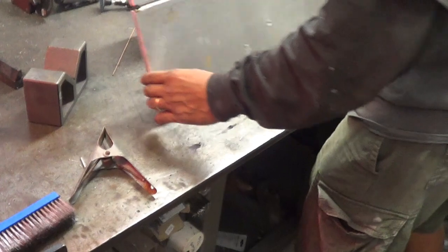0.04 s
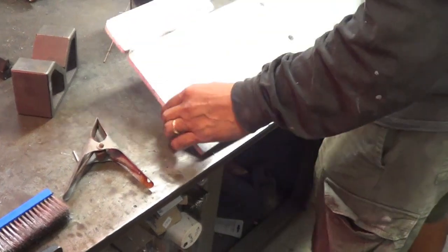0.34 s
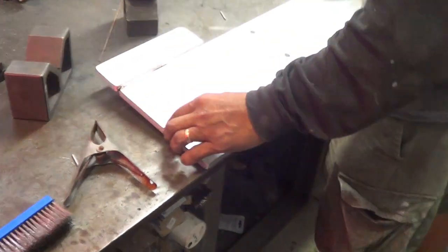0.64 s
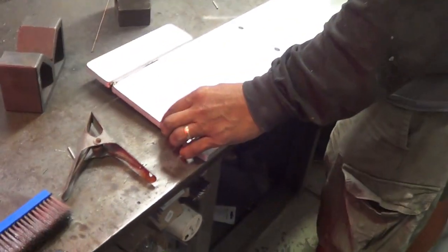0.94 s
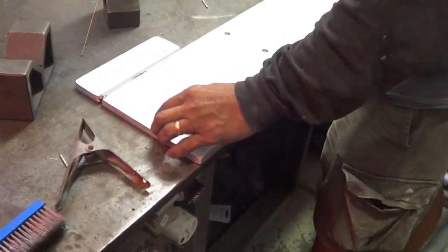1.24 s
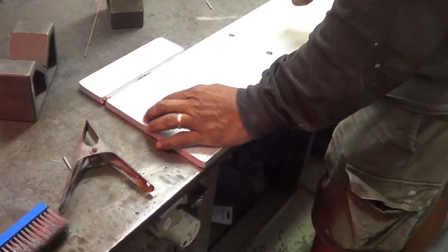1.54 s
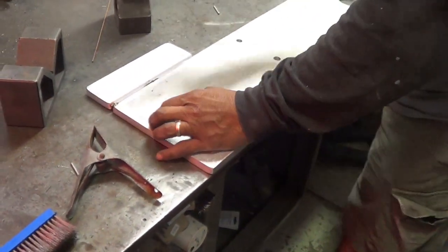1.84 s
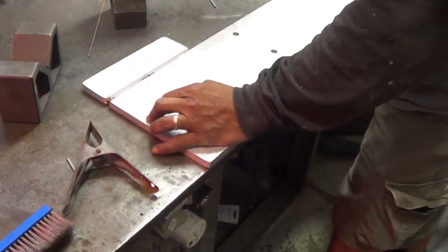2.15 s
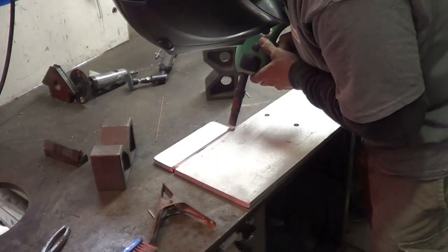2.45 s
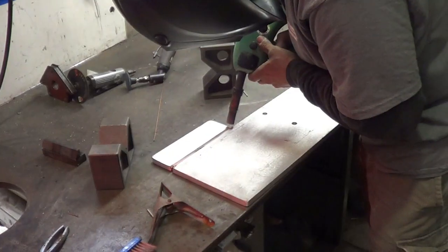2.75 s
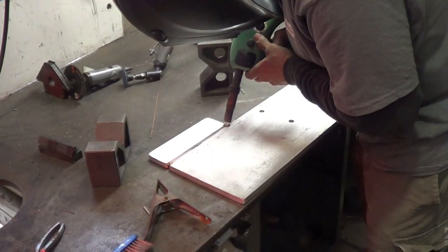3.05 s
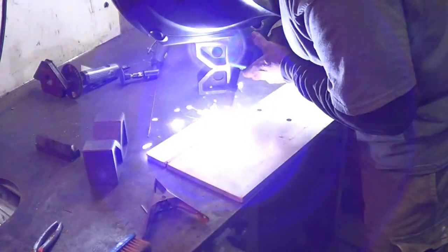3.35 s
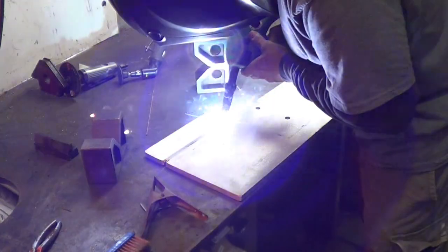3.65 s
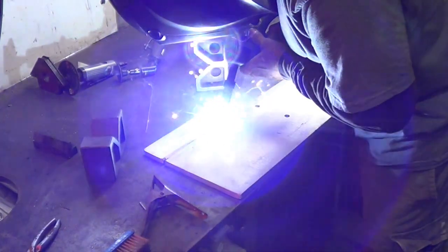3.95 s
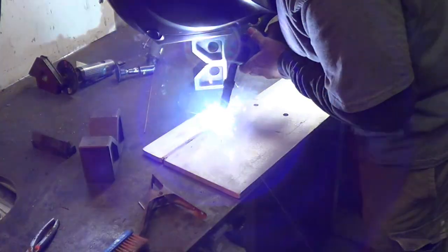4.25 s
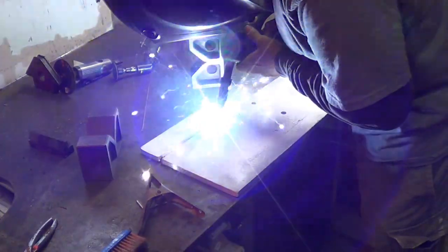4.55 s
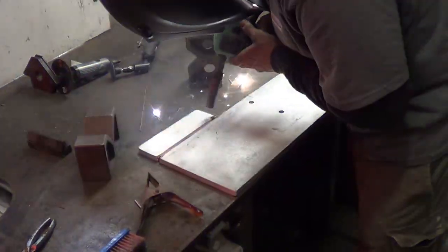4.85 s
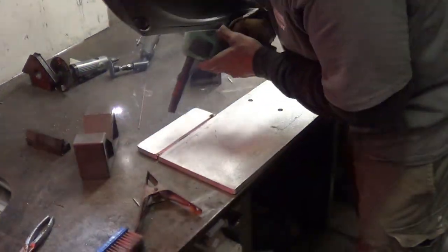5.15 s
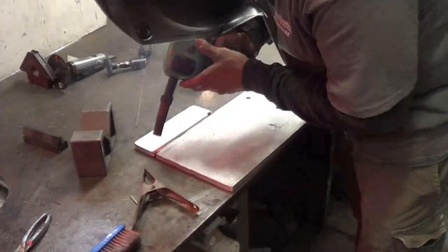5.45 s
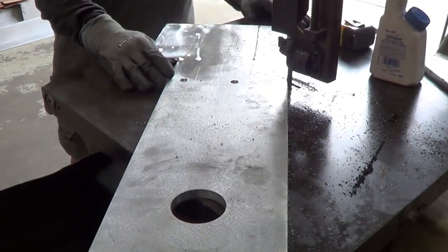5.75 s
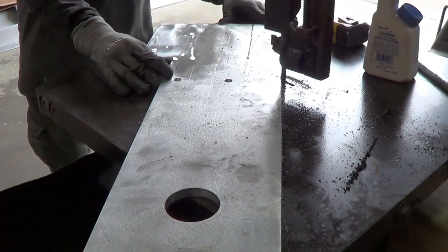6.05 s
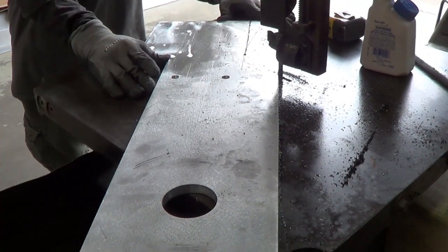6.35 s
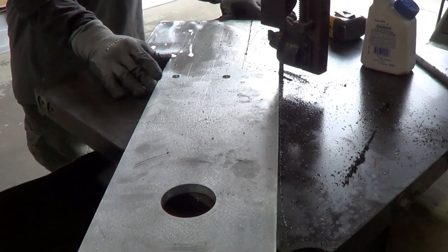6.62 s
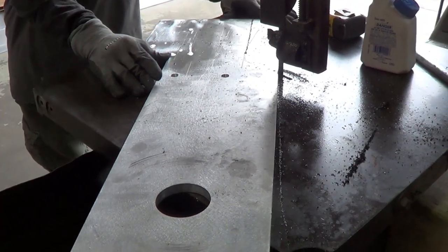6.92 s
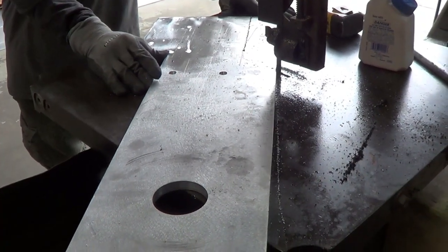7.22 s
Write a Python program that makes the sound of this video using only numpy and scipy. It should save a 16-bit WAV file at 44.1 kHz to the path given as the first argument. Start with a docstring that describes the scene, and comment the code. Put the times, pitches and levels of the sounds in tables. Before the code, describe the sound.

A steel plate scrapes and clangs onto a metal bench, a welder crackles briefly, then a band saw whines through steel.

```python
"""A steel plate scrapes, squeaks and clangs into place on a steel bench; knocks and slips ring both.
Fans drone and a welder's transformer hums. The torch hisses gas, then its arc crackles for 1.5 s
as the wire shorts and bursts. The scene changes abruptly to a band saw: its teeth whine and bite
into the plate until the blade squeals. Automatic gain control ducks the loud parts."""
import sys
import numpy as np
from scipy import signal
from scipy.fft import rfft, irfft, next_fast_len
from scipy.io import wavfile
from scipy.ndimage import uniform_filter1d, minimum_filter1d

SR = 44100
rng = np.random.default_rng(int(sys.argv[2]) if len(sys.argv) > 2 else 0)


def generate_wav(signal):
    """Clip the signal to [-1, 1] and save it as 16-bit WAV at the path in sys.argv[1]."""
    frames = np.transpose(np.atleast_2d(signal))
    scaled = np.clip(frames, -1, 1) * 32767
    pcm = np.round(scaled).astype(np.int16)
    wavfile.write(sys.argv[1], SR, pcm)


N = 329868
T = np.arange(N) / SR
FFT_SIZE = next_fast_len(N, real=True)
HZ = np.fft.rfftfreq(FFT_SIZE, 1 / SR)

# Table levels are relative.
# shoves of the plate: (start [s], length [s], push on bench [dB], push on plate edge [dB])
DRAGS = [(0, 0.066, -19.5, -28), (0.073, 0.13, -8.5, -29), (0.197, 0.073, -11.5, -49),
         (0.375, 0.095, -26, -31), (0.8, 0.098, -5, -30), (1.02, 0.019, -9.5, -44),
         (1.122, 0.023, -4.5, -20), (1.172, 0.075, -7.5, -11)]
# impacts: (time [s], bench level [dB], plate level [dB])
KNOCKS = [(.0758, -12, -24), (0.1545, -20, -26), (0.212, -26, -30), (0.3024, -18, -34), (0.3425, -14, -43),
          (0.3803, -39, -47), (0.7882, -14.5, -30), (0.799, -6, -43), (0.8144, -4.5, -44),
          (.8526, -9.5, -18), (1.014, -5.5, -27), (1.0225, -15, -46), (1.1147, -0.5, -18),
          (1.1642, -9, -0.5)]
# main steel modes: (frequency [Hz], level [dB], t60 [s])
BENCH_MODES = [(600, -5, .2), (665, -4, .2), (795, -3, .3), (865, -2, .25), (1040, 0, .33), (1100, -2, .2),
               (1200, 0, .25), (1292, 3, .3), (1606, -3, .28), (1830, -3, .25), (1954, -3, .45),
               (2120, -7, .22), (2290, -11, .22), (2630, -8, .3), (2800, -13, .3), (3020, -9, .22),
               (3250, -6, .25), (3920, -11, .28), (4170, -10, .4), (4830, -13, .3), (5590, -16, .45)]
PLATE_MODES = [(3100, -7, .22), (4280, -2, .35), (4900, -6, .25), (5254, -9, .35), (5453, -7, .3),
               (6150, -1, .35), (6799, -4, .6), (6993, -2, .4), (7343, -1, .5), (7994, 0, .45),
               (8366, -13, 1.4), (8576, -6, .35), (8753, -4, .35), (9170, -8, .35), (10050, -8, .45),
               (11690, -31, 2), (12059, -9, .4), (12613, -10, .4), (13600, -15, 1), (14061, -11, .45)]
# dense minor modes: (frequency [Hz], density [dB])
BENCH_WASH = [(100, -11), (300, -10.5), (500, -5), (650, 4.5), (1250, -2.5), (2000, -2), (2700, -10.5),
              (4500, -16), (7000, -40), (15000, -57)]
PLATE_WASH = [(500, -38), (2000, 2), (4200, -3), (6500, -2.5), (8500, -9), (12000, -9), (15500, -26)]
# partials of the upright plate: (frequency [Hz], level [dB])
SING_LINES = [(2690, -3), (3100, -1), (4290, -2), (4900, -3), (6150, -6), (7345, -7), (8560, -12),
              (9170, -11), (10050, -13)]
# edge squeaks, brief steel ringing after knocks: (start [s], length [s], start pitch [Hz], level [dB])
SQUEAKS_AND_RINGS = [(0, 0.028, 1855, -25), (0.069, .12, 1865, -17), (0.116, 0.047, 882, -11),
                     (0.121, 0.063, 1610, -13.5), (0.197, 0.084, 750, -17), (.335, 0.026, 2100, -22),
                     (.343, 0.033, 597, -20), (.815, 0.098, 1942, -13), (1.018, 0.077, 4150, -27)]
# workshop decay: (frequency [Hz], t60 [s])
ROOM_DECAY = [(200, 1), (700, 0.68), (1800, 0.58), (4600, 0.49), (12000, 0.3)]
# fan drone: (frequency [Hz], density [dB])
FAN_SPECTRUM = [(15, -50), (25, -25), (53, -17), (113, -10.5), (204, -5), (331, -7.5), (703, -10),
                (1240, -12), (1800, -12.5), (2120, -14), (4040, -19), (4620, -23), (11500, -29.5),
                (14300, -42), (15500, -33)]
# hum lines: (frequency [Hz], level before 2.39 s [dB], level from 2.39 s on [dB])
HUM_LINES = [(81.5, -44, -45.5), (120.5, -38, -29.5), (162.3, -41.5, -34), (207, -33, -34)]

# smooth hiss, receding while the weld is cold: (time [s], level [dB])
HISS_LEVELS = [(3.05, -1), (3.2, -8.5), (3.3, -11), (3.42, -16), (3.8, -10.5), (4.2, 0), (4.7, 2)]
# broad colour of gas and arc: (frequency [Hz], density [dB])
GAS_SPECTRUM = [(180, -43), (300, -15.5), (411, -11), (500, -17), (674, -14), (968, -26), (1350, -10),
                (1750, -17.5), (3180, -17), (4070, -5), (5300, -7), (6900, -0.5), (7750, -2), (12500, -3),
                (15500, -18)]
ARC_SPECTRUM = [(59, -76), (100, -51), (508, -16), (552, -16), (727, -10), (808, -15.5), (1400, -11.5),
                (1620, -13.5), (2180, -12.5), (2690, -11), (3770, -8.5), (4660, -11), (7410, -3.5),
                (12000, -5.5), (15500, -8)]
# resonances of nozzle and arc: (frequency [Hz], width [Hz], level [dB])
NOZZLE_PEAKS = [(1680, 530, -13.5), (4050, 480, -15), (6775, 620, -10), (9000, 320, -26), (14200, 800, -20),
                (15500, 840, -10.5)]
ARC_PEAKS = [(2160, 59, -27), (3820, 350, -13.5), (6800, 2500, -8), (11600, 4200, -3.5)]
# thumps at arc start and stop: (time [s], level [dB])
THUMPS = [(3.191, -10.5), (3.202, -12), (4.724, -7)]
# their ringing: (frequency [Hz], level [dB], t60 [s])
THUMP_MODES = [(193, -3, 0.11), (310, -9, 0.12), (395, -9.5, 0.31), (543, -5.5, 0.096)]
# wire spits as the arc settles: (time [s], level [dB])
SPITS = [(3.2783, 10), (3.282, 11), (3.29, 15), (3.3067, 17.5), (3.3145, 6), (3.348, 16), (3.357, 21.5),
         (3.38, 25.5), (3.394, 11), (3.398, 13)]
# the arc falters: (centre [s], length [s], dip [dB])
STUTTERS = [(3.347, 0.046, -9.5), (3.744, 0.034, -7)]

# plate feed into the saw: (time [s], tooth bite [0-1], pressure [0-1])
FEED = [(5.56, 0.11, 0.02), (6, 0.11, 0.05), (6.13, 0.48, 0.1), (6.4, 0.98, 0.15), (6.65, 0.98, 0.23),
        (6.8, 0.86, 1), (7.48, 1, 0.86)]
# frame rumble, cut chips, blade in its guides: (frequency [Hz], density [dB])
FRAME_SPECTRUM = [(25, -25), (55, -6.5), (130, -5.5), (240, 1.5), (330, -1.5), (500, -5.5), (750, -1),
                  (1050, -11.5), (1600, -5.5), (2200, -8.5), (2800, -21), (8000, -50)]
CHIP_SPECTRUM = [(88, -44), (150, -29), (234, 3.5), (572, -11), (643, -2), (1110, -9), (1870, -2),
                 (2060, -5.5), (3280, -15.5), (4310, -12), (5870, -14.5), (6230, -13), (9000, -7.5),
                 (10300, -4), (15500, -14)]
GUIDE_SPECTRUM = [(1500, -26), (2800, -3.5), (4200, -5.5), (5500, -6.5), (6800, -3), (7800, 3.5),
                  (9200, -5.5), (11000, 5), (13000, -1), (15500, -7.5)]
# saw motor: (frequency [Hz], level [dB])
MOTOR_LINES = [(58.5, -42), (91.5, -34.5), (237, -42), (1147, -38), (1195, -50)]
# blade resonances: (frequency [Hz], light pressure [dB], hard pressure [dB])
BLADE_MODES = [(1836, -36, -32), (1945, -33, -39), (2212, -39, -36), (4265, -41, -44), (4440, -39, -43),
               (4818, -43, -38), (5259, -46, -37), (5329, -42, -44), (5529, -49, -37), (5803, -52, -44),
               (6316, -55, -37), (6966, -40, -54), (7228, -37, -38), (7741, -42, -37), (7975, -56, -60),
               (8625, -42, -36), (8699, -38, -48), (9165, -36, -39), (9433, -37, -32), (9680, -49, -31),
               (9970, -41, -24), (10202, -30, -25), (10400, -45, -31), (10540, -43, -34), (10805, -41, -36),
               (12199, -50, -39), (12458, -40, -32), (12909, -41, -53), (13264, -55, -40),
               (14282, -39, -48)]
# the blade catches, one mode flares: (centre [s], length [s], frequency [Hz], level [dB])
FLARES = [(6.3, .22, 5329, -27.5), (6.497, 0.073, 1950, -22), (6.786, 0.066, 6316, -21),
          (6.937, 0.17, 6316, -25.5), (7.198, 0.29, 6316, -21), (7.39, 0.051, 1836, -24),
          (7.42, .07, 6316, -22)]

# shift between the stereo ports: (frequency [Hz], phase [rad])
BENCH_PHASE = [(0, 0), (200, 0.37), (520, 1), (1460, 0.79), (3700, 0.45), (7300, 0.51), (9500, 0.26),
               (16000, 0)]
SAW_PHASE = [(0, 0), (200, 0.4), (600, 1.2), (1380, 0.7), (1980, 0.71), (2760, 0), (5600, 0.14), (10000, 0),
             (16000, 0)]
# diffuse side signal: (frequency [Hz], level [dB])
SIDE_SPECTRUM = [(50, -26), (250, -15), (700, -19), (2000, -21), (6000, -14), (10000, -17.5), (15000, -65)]

DRAG_ATTACK_S, BENCH_STOP_DB_PER_S, EDGE_STOP_DB_PER_S = 0.0041, 450, 161
HUM_CHANGE_S, GAS_ON_S, ARC_ON_S, TORCH_OFF_S = 2.39, 2.965, 3.215, 4.715
GAS_RISE_S, ARC_RISE_S = 0.076, 0.09
SAW_START_S, TOOTH_HZ = 5.555, 636
THROB_HZ, THROB_PEAK_S = 6.9, 6.99


def amp(db):
    """Decibels to gain."""
    return np.exp(np.asarray(db) * np.log(10) / 20)


def unit(x):
    """Scale to rms 1."""
    return x / np.sqrt(np.mean(x ** 2) + 1e-20)


def curves(rows):
    """Columns of a time table, one value a sample."""
    times_s, *columns = np.transpose(rows)
    return [np.interp(T, times_s, column) for column in columns]


def at_hz(table, hz):
    """Interpolate a table on a log frequency axis."""
    table_hz, value = np.transpose(table)
    return np.interp(np.log(hz + 1), np.log(table_hz + 1), value)


def filtered(x, gain):
    """Apply a gain given on the grid HZ."""
    return irfft(rfft(x, FFT_SIZE) * gain, FFT_SIZE)[:N]


def noise(spectrum):
    """Steady coloured noise, rms 1."""
    return unit(filtered(rng.standard_normal(N), amp(at_hz(spectrum, HZ))))


def wander(rate_hz):
    """Slow random drift, rms about 1."""
    size, step = 4096, 100
    hz = np.fft.rfftfreq(size, step / SR)
    slow = irfft(rfft(rng.standard_normal(size)) / (1 + (hz / rate_hz) ** 4))
    return np.interp(T, np.arange(size) * step / SR, unit(slow))


def tone(hz, waver, rate_hz):
    """Sinusoid wavering in level and phase, rms 1."""
    angle = 2 * np.pi * (np.cumsum(hz * np.ones(N)) / SR + rng.random())
    in_phase = (1 + waver * wander(rate_hz)) * np.cos(angle)
    return unit(in_phase + waver * wander(rate_hz) * np.sin(angle))


def clicks(times_s, db):
    """Single-sample impulses."""
    return np.bincount(np.round(np.asarray(times_s) * SR).astype(int), amp(db), N)[:N]


def gate(start_s, length_s, attack_s, release_db_per_s):
    """Attack, hold and release gain."""
    attack = np.clip((T - start_s) / attack_s, 0, 1)
    return attack * amp(-release_db_per_s * np.clip(T - start_s - length_s, 0, 1))


def swell(centre_s, length_s):
    """Gaussian bump of height 1."""
    return np.exp(-np.minimum(2 * (T - centre_s) ** 2 / length_s ** 2, 20))


def ring(modes):
    """Impulse response of decaying modes, alternating in sign."""
    t = T[:SR]
    return sum(amp(db - 60 * t / t60_s) * np.sin(2 * np.pi * hz * t + np.pi * k)
               for k, (hz, db, t60_s) in enumerate(modes))


def resonator(force, hz, t60_s):
    """One decaying mode driven by a force."""
    radius, angle = 1000 ** (-1 / (t60_s * SR)), 2 * np.pi * hz / SR
    return signal.lfilter([0, radius * np.sin(angle)], [1, -2 * radius * np.cos(angle), radius ** 2], force)


def colour(x, spectrum, peaks):
    """Minimum-phase colour plus resonances, at unit power gain."""
    gain_db = np.maximum(at_hz(spectrum, abs(np.fft.fftfreq(2048, 1 / SR))), -70)
    broad = np.fft.ifft(np.exp(np.conj(signal.hilbert(np.log(amp(gain_db)))))).real
    response = broad = broad / np.linalg.norm(broad)
    for hz, width_hz, db in peaks:
        peak = signal.lfilter(*signal.iirpeak(hz, hz / width_hz, SR), broad)
        response = response + amp(db) * peak / np.linalg.norm(peak)
    return signal.oaconvolve(x, response / np.linalg.norm(response))[:N]


def room(x):
    """Diffuse workshop tail; each band decays at its own rate."""
    hz, t, bands = signal.stft(rng.standard_normal(SR) * (T[:SR] > .004), SR, nperseg=256)
    decay = amp(-60 * t / at_hz(ROOM_DECAY, hz)[:, None])
    tail = signal.istft(bands * decay, SR, nperseg=256)[1]
    return signal.oaconvolve(x, tail / np.linalg.norm(tail))[:N]


def steel_body(push, knocks, modes, wash, wash_t60_s, wash_rise_s, slips_per_s, contact_db):
    """Knocks and tiny dragging slips ring one steel body."""
    t, bell = T[:SR], ring(modes)
    dense = noise(wash)[:SR] * amp(-60 * t / wash_t60_s) * (1 - np.exp(-t / wash_rise_s))
    dense /= np.linalg.norm(dense)
    mode_gain = amp(0.5) / np.linalg.norm(bell)
    response = dense + mode_gain * bell
    slips = unit(rng.standard_normal(N) * (rng.random(N) < slips_per_s / SR))
    force = slips * push / np.linalg.norm(response) + knocks / np.std(response[:SR // 50])
    ringing = np.zeros(N)
    for k, (hz, db, t60_s) in enumerate(modes):
        share = amp(db + contact_db * (np.tanh(wander(5)) - 1.6))  # the contact point moves
        ringing += (-1) ** k * resonator(force * share, hz, t60_s)
    return signal.oaconvolve(force, dense)[:N] + mode_gain * ringing


def plate_singing(start_db=-30, fade_db_per_s=48, flat_at_s=.32):
    """On its edge the plate sings, fading until it lies flat."""
    upright = gate(0, flat_at_s, DRAG_ATTACK_S, BENCH_STOP_DB_PER_S)
    partials = sum(amp(db) * tone(hz, waver=0.57, rate_hz=11) for hz, db in SING_LINES)
    return amp(start_db - fade_db_per_s * T) * upright * partials


def squeaks_and_rings(rise_hz_per_s=250, stop_db_per_s=380):
    """Edge squeaks and brief steel ringing after the knocks, as slightly rising tones."""
    tones = np.zeros(N)
    for start_s, length_s, hz, db in SQUEAKS_AND_RINGS:
        gain = amp(db) * gate(start_s, length_s, DRAG_ATTACK_S, stop_db_per_s)
        tones += gain * tone(hz + rise_hz_per_s * (T - start_s), waver=0.88, rate_hz=43)
    return tones


def plate_on_bench():
    """Shoves and knocks: the bench clangs low, the plate rings high."""
    bench_push, plate_push = np.zeros((2, N))
    for start_s, length_s, push_db, edge_db in DRAGS:
        bench_push += amp(push_db) * gate(start_s, length_s, DRAG_ATTACK_S, BENCH_STOP_DB_PER_S)
        plate_push += amp(edge_db) * gate(start_s, length_s, DRAG_ATTACK_S, EDGE_STOP_DB_PER_S)
    knock_s, bench_db, plate_db = np.transpose(KNOCKS)
    bench = steel_body(bench_push, clicks(knock_s, bench_db), BENCH_MODES, BENCH_WASH,
                       wash_t60_s=0.14, wash_rise_s=0.0013, slips_per_s=500, contact_db=4.0)
    plate = steel_body(plate_push, clicks(knock_s, plate_db), PLATE_MODES, PLATE_WASH,
                       wash_t60_s=0.44, wash_rise_s=0.0023, slips_per_s=900, contact_db=2.5)
    direct = bench + plate + plate_singing() + squeaks_and_rings()
    return direct + amp(-7) * room(direct)


def shop_drone(fan_db=-23, hum_sag=0.74):
    """Fans drone over transformer hum; the hum changes abruptly at 2.39 s and sags under the arc."""
    changed = np.clip((T - HUM_CHANGE_S) / 0.017, 0, 1)
    strength = changed * (1 - hum_sag * torch_gate(ARC_ON_S, ARC_RISE_S))
    hum = sum(amp(before_db + strength * (after_db - before_db)) * tone(hz, waver=0.84, rate_hz=14.3)
              for hz, before_db, after_db in HUM_LINES)
    return amp(fan_db + 0.81 * wander(27)) * noise(FAN_SPECTRUM) + hum


def torch_gate(start_s, rise_s):
    """Rise, then hold until the trigger is released."""
    return gate(start_s, TORCH_OFF_S - start_s, rise_s, release_db_per_s=1201)


def gas_hiss():
    """Gas rushes through the resonant nozzle."""
    hiss_db, = curves(HISS_LEVELS)
    hiss = colour(rng.standard_normal(N), GAS_SPECTRUM, NOZZLE_PEAKS)
    return hiss * amp(hiss_db) * torch_gate(GAS_ON_S, GAS_RISE_S) ** 2


def arc_thumps():
    """Low modes ring as the arc starts and stops."""
    return signal.oaconvolve(clicks(*np.transpose(THUMPS)), ring(THUMP_MODES))[:N]


def arc_crackle(shorts_per_s=420, ripple_hz=120, spread_db=3.0, spray_s=0.002, settle_db_per_s=3.5):
    """The wire shorts and bursts at a rate that pulses with the mains: a snap, then a spray of fizz."""
    mains = 1 + 0.45 * np.sin(2 * np.pi * ripple_hz * T)
    fires = rng.random(N) < shorts_per_s * mains / SR
    snaps = fires * amp(spread_db * np.minimum(rng.exponential(1, N), 2.5))
    spray_gain = signal.lfilter([1], [1, -np.exp(-1 / (spray_s * SR))], uniform_filter1d(snaps, size=36))
    spray = spray_gain * rng.standard_normal(N)
    sizzle = rng.standard_normal(N)
    crackle = unit(unit(spray) + amp(-8) * unit(snaps) + amp(-7) * sizzle)
    stutter_db = sum(db * swell(centre_s, length_s) for centre_s, length_s, db in STUTTERS)
    level_db = 12.5 - settle_db_per_s * (T - ARC_ON_S) + stutter_db + 0.3 * wander(2.0)
    crackle *= torch_gate(ARC_ON_S, ARC_RISE_S) ** 2 * amp(level_db)
    spits = amp(8.0) * clicks(*np.transpose(SPITS))
    return colour(crackle + spits, ARC_SPECTRUM, ARC_PEAKS)


def welding_torch(echo_s=0.000958, echo_gain=0.29):
    """Gas and arc reflect off the plate; the delay drifts as the torch moves."""
    direct = gas_hiss() + arc_crackle()
    delay_s = echo_s * (1 + 0.035 * wander(5.6))
    torch = direct + echo_gain * np.interp(T - delay_s, T, direct) + arc_thumps()
    return torch + amp(-1.5) * room(torch)


def saw_gain(free_db, bite_db, pressure_db, throb_db=0):
    """Gain that follows the feed and throbs as the band runs unevenly on its wheels."""
    bite, pressure = curves(FEED)
    throb = np.cos(2 * np.pi * THROB_HZ * (T - THROB_PEAK_S))
    return amp(free_db + bite_db * bite + pressure_db * pressure + throb_db * throb)


def saw_rumble():
    """Frame noise and motor tones share one unsteady level."""
    gain = saw_gain(free_db=-24, bite_db=-3.5, pressure_db=1) * amp(1.16 * wander(18))
    frame = noise(FRAME_SPECTRUM)
    motor = sum(amp(db) * tone(hz, waver=0.52, rate_hz=3.4) for hz, db in MOTOR_LINES)
    return gain * (frame + motor / gain.max())


def tooth_whine():
    """Teeth strike the plate's edge; the drive shakes the blade, adding side tones."""
    shake = 1 + 0.1 * np.sin(2 * np.pi * 50 * T) + 0.27 * np.sin(2 * np.pi * 31.5 * T)
    whine = tone(TOOTH_HZ * (1 + 0.0016 * wander(2.4)), waver=0.21, rate_hz=45)
    return saw_gain(free_db=-22, bite_db=-4.5, pressure_db=-3, throb_db=2.8) * unit(shake * whine)


def minor_modes(count=70, width_hz=19, spread_db=2.0):
    """Gain on HZ of the weak resonances of blade, plate and table."""
    centres_hz = rng.uniform(2417, 15000, count)
    heights = amp(12.5 + spread_db * rng.standard_normal(count))
    grid_hz = HZ[::8]
    power = sum(height ** 2 / (1 + ((grid_hz - hz) / (width_hz / 2)) ** 2)
                for hz, height in zip(centres_hz, heights))
    return np.interp(HZ, grid_hz, np.sqrt(1 + power))


def chip_rasp():
    """As the teeth bite, guide hiss gives way to chips rasping at the tooth rate."""
    teeth = 1 + 0.47 * np.sin(2 * np.pi * TOOTH_HZ * T)
    rasp = unit(filtered(teeth * noise(CHIP_SPECTRUM), minor_modes()))
    bite, _ = curves(FEED)
    gain = saw_gain(free_db=-27, bite_db=13, pressure_db=1, throb_db=0.5) * amp(1.45 * wander(60))
    return gain * (np.sqrt(bite) * rasp + np.sqrt(1 - bite) * noise(GUIDE_SPECTRUM))


def blade_ringing():
    """Pressure shifts the ringing between modes; a pair near 10 kHz squeals; catches flare up."""
    _, pressure = curves(FEED)
    drift = 1 + 0.000292 * wander(3.3)
    ringing, squeal, squeal_power = np.zeros((3, N))
    for hz, light_db, hard_db in BLADE_MODES:
        gain = (1 - pressure) * amp(light_db) + pressure * amp(hard_db)
        if 9900 < hz < 10300:
            squeal += gain * tone(hz * drift, waver=0.64, rate_hz=4.7)
            squeal_power += gain ** 2
        elif hz < 3000:
            ringing += gain * tone(hz * drift, waver=2.0, rate_hz=26.6)
        else:
            ringing += gain * tone(hz * drift, waver=0.76, rate_hz=44.0)
    ringing *= saw_gain(free_db=-13.5, bite_db=20.5, pressure_db=2.5, throb_db=0.5)
    squeal *= saw_gain(free_db=-40, bite_db=16, pressure_db=11.5) / np.sqrt(squeal_power)
    flares = sum(amp(db) * swell(centre_s, length_s) * tone(hz * drift, waver=0.29, rate_hz=22)
                 for centre_s, length_s, hz, db in FLARES)
    return ringing + squeal + flares


def stereo_ports(x, phase):
    """Two close microphone ports: phase-shifted direct sound plus a weak diffuse difference."""
    shifted = amp(-1.0) * filtered(x, 1j * np.tan(at_hz(phase, HZ) / 2))
    side = shifted + filtered(room(x), amp(at_hz(SIDE_SPECTRUM, HZ)))
    return np.array([amp(-0.56) * x + side, amp(-1.0) * x - side])


def scene():
    """Bench work, then a 2 ms crossfade to the band saw."""
    bench = stereo_ports(shop_drone() + plate_on_bench() + welding_torch(), BENCH_PHASE)
    saw = amp(22.5) * (saw_rumble() + tooth_whine() + chip_rasp() + blade_ringing())
    at_saw = np.clip((T - SAW_START_S) / 0.002 + .5, 0, 1)
    return (1 - at_saw) * bench + at_saw * stereo_ports(saw, SAW_PHASE)


def peak_hold(db, recovery_db_per_s):
    """Instant rise, steady fall."""
    fall_db = recovery_db_per_s * T
    return np.maximum.accumulate(db + fall_db) - fall_db


def record(dry, threshold_db=-7.5, strength=0.95, slack_db=6.0, cutoff_hz=15850):
    """Gain control with quick and slow recovery, then a low-pass."""
    peaks = -minimum_filter1d(-abs(dry.mean(0)), size=200)
    level_db = 20 * np.log10(uniform_filter1d(peaks, size=400) + 1e-6)
    over_db = np.maximum(level_db - threshold_db, 0)
    quick_db = peak_hold(over_db, recovery_db_per_s=39.5)
    slow_db = peak_hold(over_db - slack_db, recovery_db_per_s=3.0)
    duck_db = strength * uniform_filter1d(np.maximum(quick_db, slow_db), size=100)
    lowpass = signal.firwin(511, cutoff_hz, window=("kaiser", 9), fs=SR)
    return signal.oaconvolve(dry * amp(-duck_db), lowpass[None], "same")


dry = scene()
out = record(dry)
generate_wav(out)
```